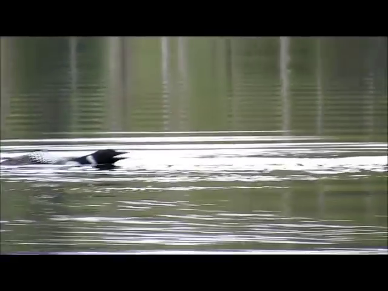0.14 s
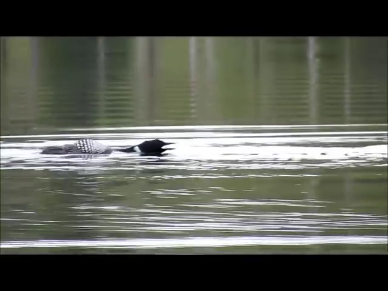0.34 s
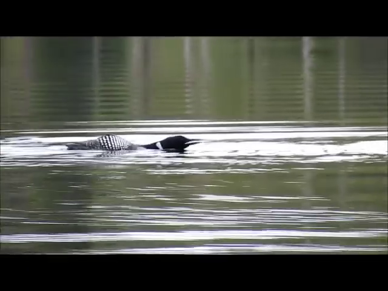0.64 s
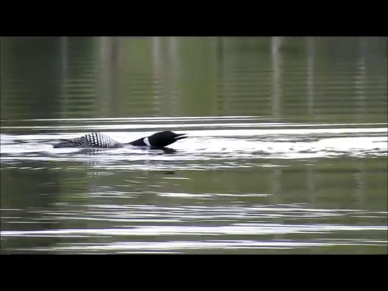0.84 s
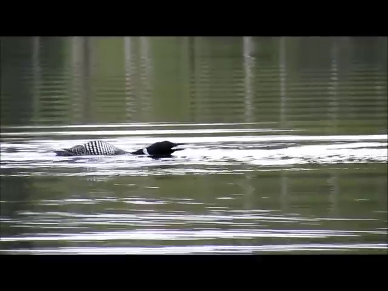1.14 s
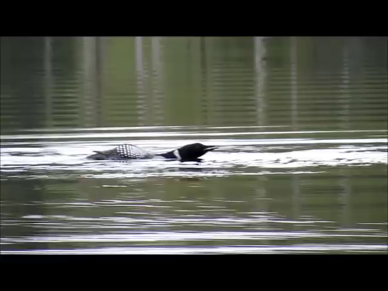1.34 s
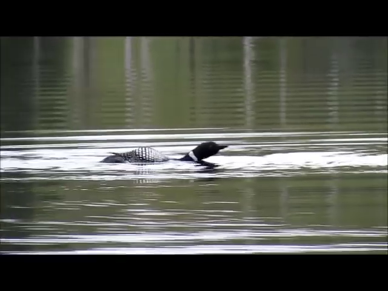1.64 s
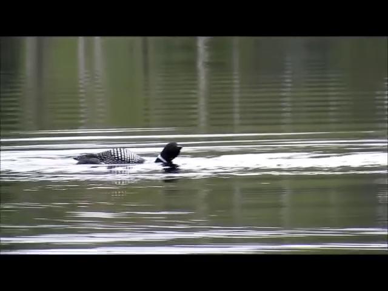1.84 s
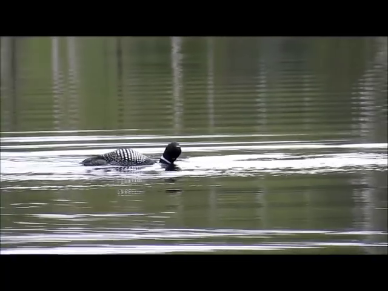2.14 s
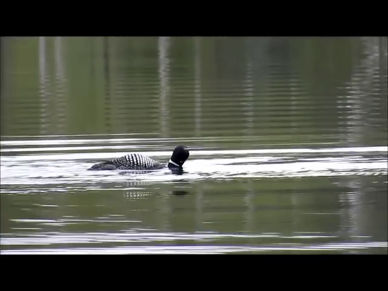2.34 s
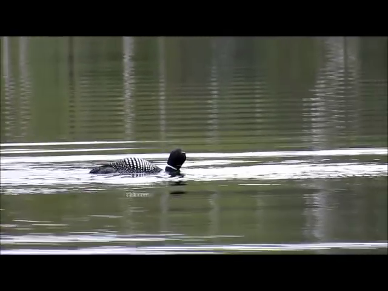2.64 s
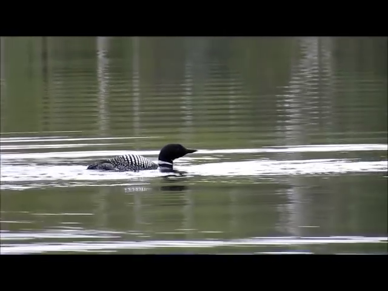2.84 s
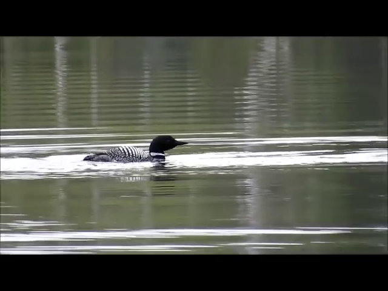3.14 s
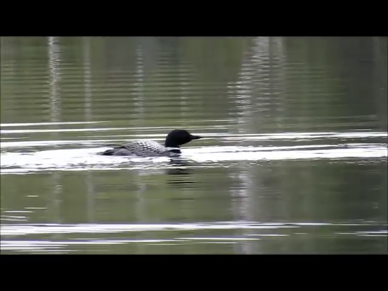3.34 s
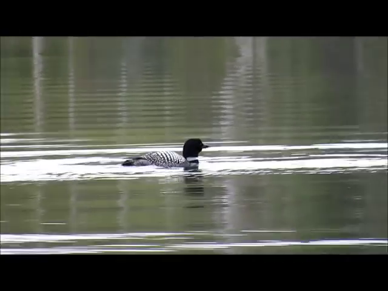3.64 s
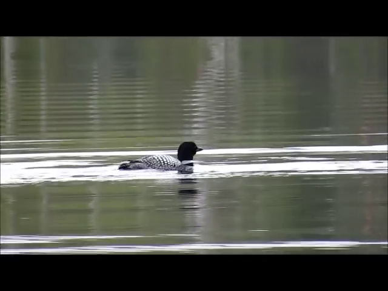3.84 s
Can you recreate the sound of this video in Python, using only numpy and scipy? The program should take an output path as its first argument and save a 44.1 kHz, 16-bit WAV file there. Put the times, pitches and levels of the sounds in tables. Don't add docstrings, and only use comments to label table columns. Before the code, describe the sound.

A loon's yodel is already sounding at 0 s: a loud, nearly pure whistle that steps up, splits into a rough, beating double tone near 0.4, and breaks downward. It leaps up again at 0.7, peaks, and sinks by 1.2. A second yodel rises at 1.2 and drops off by 1.65. Then faint wavering shore echoes, strongest near 3.2, sparse distant bird whistles, a trill around 2, steady hiss, low rumble, hum and tiny camera ticks.

```python
import sys
import numpy as np
from scipy import signal
from scipy.fft import rfft, irfft, next_fast_len
from scipy.io import wavfile
from scipy.ndimage import map_coordinates

SR = 44100
rng = np.random.default_rng(int(sys.argv[2]) if len(sys.argv) > 2 else 0)


def generate_wav(sig):
    pcm = np.round(np.clip(np.atleast_2d(sig).T, -1, 1) * 32767).astype(np.int16)
    wavfile.write(sys.argv[1], SR, pcm)


def linear_from_db(decibels):
    return 10 ** (np.asarray(decibels, float) / 20)


N = 176400
T = np.arange(N) / SR
EDGE_S = .003
RASP_HZ = 900
PORTS = np.array([[.5], [-.5]])


def unit(x):
    return x / np.sqrt(np.mean(x ** 2) + 1e-20)


def along(points, hz):
    f, v = np.transpose(points)
    return np.interp(np.log(hz + 1), np.log(f + 1), v)


def wobble(rate):
    knots = rng.standard_normal(int(N * rate / SR) + 4)
    return map_coordinates(knots, [T * rate])


def flutter(rate):
    return wobble(rate) + 1j * wobble(rate)


def filtered(x, response):
    m = next_fast_len(N + 8192)
    return irfft(rfft(x, m) * response(np.fft.rfftfreq(m, 1 / SR)), m)[..., :N]


def scatter(x, t60):
    t = T[:SR // 3]
    tail = rng.standard_normal((2, len(t))) * linear_from_db(-60 * t / t60)
    return signal.fftconvolve(np.atleast_2d(x), tail / np.linalg.norm(tail[0]), axes=1)[:, :N]


def note(rows, edge):
    s, *cols = np.transpose(rows)
    t = T[(T > s[0] - edge) & (T < s[-1] + edge)]
    since_start = t - s[0] + edge if s[0] > .01 else 1
    to_edge = np.minimum(since_start, s[-1] + edge - t)
    gate = np.sin(np.pi / 4 * np.clip(to_edge / edge, 0, 2)) ** 2
    start = round(t[0] * SR)
    return slice(start, start + len(t)), np.sqrt(2) * gate, [np.interp(t, s, c) for c in cols]


def spin(hz):
    return np.exp(2j * np.pi * (np.cumsum(hz) / SR + rng.random()))


def breath():
    skirt = 1 + linear_from_db(-33) * flutter(600)
    return skirt * linear_from_db(.12 * wobble(55))


def held_notes(skirt):
    # t/s, pitch f/Hz, level/dB, 2nd overtone level/dB, 3rd overtone level/dB
    held = [
        [(0, 1802, -41, -75, -77), (.05, 1886, -39, -78, -80.5), (.075, 1864, -36, -70, -70.5),
         (.15, 1824, -38, -75.5, -95.5), (.205, 1847, -39.5, -75.5, -76), (.258, 1893, -41, -82, -84),
         (.279, 1954, -43, -88, -73)],
        [(.713, 1760, -45, -85.5, -82), (.728, 1847, -38, -80.5, -91.5), (.742, 1890, -37.5, -72, -73),
         (.765, 1928, -38.5, -68, -70.5), (.806, 2010, -44.5, -75, -89)],
        [(.9, 1952, -38.5, -68, -76), (.915, 1922, -36.5, -63.5, -82.5), (.98, 1887, -36, -70.5, -92.5),
         (1.012, 1832, -37, -77.5, -80.5), (1.035, 1765, -41, -82, -78)],
        [(1.251, 1817, -42, -83, -94.5), (1.268, 1831, -39, -69, -66), (1.305, 1873, -36.5, -68.5, -65.5),
         (1.365, 1885, -35, -71, -77), (1.43, 1868, -36, -75.5, -78.5), (1.49, 1907, -38, -71, -76.5),
         (1.534, 1977, -42.5, -82, -76)],
    ]
    step_up = [
        (0.283, 2064, -47, -72.5, -75),
        (0.325, 2131, -48, -69, -82),
        (0.366, 2214, -49, -71.5, -98),
    ]
    step_down = [
        (1.037, 1570, -39, -76, -90),
        (1.06, 1475, -40, -100, -70.5),
        (1.098, 1394, -54, -98.5, -86),
    ]
    low_note = [
        (1.102, 1035, -50.5, -68, -88),
        (1.13, 988, -54.5, -74, -86),
        (1.18, 930, -62, -76, -90),
    ]
    out = np.zeros(N)
    for rows in [*held, step_up, step_down, low_note]:
        at, gate, (hz, db, second_db, third_db) = note(rows, EDGE_S)
        u = spin(hz)
        voice = linear_from_db(db) * (u + linear_from_db(-56) * u ** 4)
        voice = voice + linear_from_db(second_db) * u ** 2
        voice = voice + linear_from_db(third_db + 1.5 * wobble(25)[at]) * u ** 3
        out[at] += (gate * skirt[at] * voice).real
    return out


def water(x):
    # f/Hz, level/dB
    voice_pan = [(1900, 0.1), (2400, -1.3)]
    # t/s, left over right level/dB
    head_turn = [
        (.3, 0),
        (.8, 0.6),
        (1.6, 1),
    ]
    lead_s = 2.5e-5

    def path(hz):
        return linear_from_db(PORTS * along(voice_pan, hz)) * np.exp(2j * np.pi * hz * PORTS * lead_s)

    direct = filtered(x, path) * linear_from_db(PORTS * np.interp(T, *np.transpose(head_turn)))
    return direct + linear_from_db(-38) * scatter(x, .12)


def floor():
    # f/Hz, density level/dB per Hz
    mid_noise = [(24, -107), (75, -93), (300, -102), (470, -104), (760, -100), (1500, -110), (4000, -117),
                 (13500, -128)]
    # f/Hz, density level/dB per Hz
    side_noise = [(22, -90.5), (110, -80.5), (340, -88.5), (700, -97), (1600, -112), (3300, -116),
                  (8000, -123), (13500, -131)]
    # f/Hz, rms level/dB
    mains = [(60, -81.5), (120, -85), (180, -86.5), (240, -85), (300, -85), (480, -91.5)]
    layers = []
    for density in (mid_noise, side_noise):
        hiss = filtered(rng.standard_normal(N), lambda hz: linear_from_db(along(density, hz)))
        layers.append(linear_from_db(.4 * wobble(2.5)) * np.sqrt(SR / 2) * hiss)
    hum = sum(np.sqrt(2) * linear_from_db(db + 4.3 * wobble(7.1)) * spin(hz + 0 * T).real for hz, db in mains)
    mid, side = layers[0] + hum, layers[1]
    return np.array([mid + side, mid - side])


def birds():
    # start t/s, end t/s, first f/Hz, last f/Hz, level/dB
    whistles = [(0.101, .17, 2740, 2830, -76), (0.161, 0.308, 2930, 2880, -78.5),
                (0.167, .19, 2830, 2550, -75), (.27, 0.327, 3620, 2980, -80),
                (0.618, 0.705, 3420, 2820, -84), (0.767, .87, 2980, 3450, -82),
                (1.83, 1.892, 2520, 2564, -83), (3.496, 3.574, 2240, 2240, -82.5),
                (1.123, 1.212, 2847, 2686, -73), (1.242, 1.302, 2630, 2220, -79),
                (1.616, 1.69, 2570, 2580, -76.5), (1.754, 1.765, 3500, 3260, -77.5),
                (3.31, 3.366, 3210, 2980, -84), (3.4, 3.468, 2784, 2746, -74.5),
                (3.474, 3.535, 2766, 2380, -81), (3.574, 3.63, 3660, 3140, -78.5),
                (3.755, 3.809, 2740, 2070, -81)]
    # start t/s, end t/s, middle f/Hz, notes a second, level/dB
    start, end, middle, rate, trill_db = (1.94, 2.33, 2770, 30, -79)
    trill = []
    for s in np.arange(start, end, 1 / rate):
        last = middle - 1800 * (s - 2.2) ** 2
        trill.append((s, s + 0.3 / rate, last + 50, last, trill_db))
    out = np.zeros((2, N))
    for a, b, first, last, db in whistles + trill:
        at, gate, (hz,) = note([(a, first), (b, last)], 0.005)
        u = spin(hz) * (1 + .55 * flutter(90)[at])
        out[:, at] += (linear_from_db(db) * gate * u * np.exp(1.2j * PORTS)).real
    return out + linear_from_db(-6) * scatter(out, .3)


def ticks():
    # t/s, peak level/dB
    strikes = [(0.1042, -69), (0.1326, -72.5), (0.192, -71), (0.2264, -68.5), (0.4811, -71), (0.5442, -73),
               (0.5788, -49), (0.598, -65), (0.634, -63), (0.6503, -67), (0.9046, -65.5), (1.4863, -59),
               (1.4993, -71.5), (1.5944, -78), (1.6731, -76), (1.8447, -64), (1.8594, -71), (1.9488, -63),
               (1.9613, -54), (2.4553, -75), (2.7142, -67), (2.7387, -72), (2.817, -73.5), (2.9193, -68),
               (3.1717, -74), (3.265, -73), (3.465, -69), (3.6664, -64), (3.684, -65)]
    # t/s, level/dB, f/Hz, width f/Hz
    knock_s, knock_db, knock_hz, knock_width_hz = (1.9605, -55, 4500, 7000)
    tick_hz, tick_width_hz, t60, trim_db, pan_db = 11800, 2200, 0.0054, -0.5, -2
    bright, dull, t = np.zeros((2, N + 999)), np.zeros(N), T[:400]
    for s, db in strikes:
        decay = linear_from_db(db + trim_db - 60 * t / t60 + pan_db * PORTS)
        burst = decay * (rng.standard_normal(len(t)) + 0.83 * rng.standard_normal((2, len(t))))
        edge = np.diff(burst, 2)
        bright[:, round(s * SR):][:, :len(t)] += burst * linear_from_db(db + trim_db + 21) / np.linalg.norm(edge)
    dull[round(knock_s * SR):][:len(t)] = linear_from_db(knock_db - 60 * t / t60) * rng.standard_normal(len(t))

    def ring(f, centre, width):
        return (1j * f * width / (centre * centre - f * f + 1j * f * width)) ** 2

    def body(f):
        return ring(f, tick_hz, tick_width_hz) + .08 * ring(f, .7 * tick_hz, tick_hz)

    knock = filtered(dull, lambda f: ring(f, knock_hz, knock_width_hz))
    return 3 * filtered(bright[:, :N], body) + knock


def split_voice(skirt):
    # t/s, lower f/Hz, upper f/Hz, lower level/dB, upper level/dB, pitch jitter f/Hz
    splits = [
        [(.338, 2165, 2385, -75, -68, 10), (.356, 2195, 2380, -75, -61, 15), (.367, 2240, 2440, -57, -50, 20),
         (.374, 2200, 2430, -66, -50, 5), (.392, 2150, 2380, -63, -50, 10), (.404, 2000, 2300, -53, -52, 40)],
        [(.807, 2120, 2370, -49, -59, 12), (.83, 2148, 2375, -49, -49, 3), (.88, 2142, 2355, -50, -49, 5),
         (.892, 2110, 2365, -49, -49, 20), (.902, 2020, 2370, -50, -53, 30)],
        [(1.536, 2070, 2350, -48, -60, 15), (1.552, 2135, 2345, -51, -50, 20),
         (1.568, 2230, 2345, -53.5, -48.5, 8), (1.59, 2240, 2345, -53.5, -48.5, 8),
         (1.606, 2090, 2290, -53, -51, 30)],
    ]
    split_overtones = [(-16, -20, -15.5, -41, -30, -19, -36), (-15.5, -25, -16.5, -38.5, -31, -27.5, -23.5),
                       (-16, -15, -12, -31, -18, -10.5, -27)]
    below = (-14, -21)
    out = np.zeros(N)
    for rows, over_db in zip(splits, split_overtones):
        at, gate, (low, high, low_db, high_db, jitter) = note(rows, EDGE_S)
        u = spin(low + jitter * wobble(150)[at])
        v = spin(high + jitter * wobble(150)[at])
        p, q = linear_from_db(low_db), linear_from_db(high_db)
        pair = p * u + q * v
        mixed_below = p * sum(linear_from_db(db) * u * (-u / v) ** (k + 1) for k, db in enumerate(below))
        mixed_above = linear_from_db(-31.5) * np.sqrt(p * q) * v * v / u
        lower, upper = p / (p + q) * u, q / (p + q) * v
        seconds = [lower ** 2, -lower * upper, upper ** 2]
        thirds = [lower ** 3, lower ** 2 * upper, lower * upper ** 2, upper ** 3]
        over = (p + q) * (linear_from_db(over_db) @ np.array(seconds + thirds))
        rough = 0.0098 * jitter * flutter(RASP_HZ)[at]
        voice = pair * (1 + rough / 2) + mixed_below + over * (1 + 2 * rough) + mixed_above
        out[at] += (gate * skirt[at] * voice).real
    return out


def register_flips():
    # start t/s, end t/s, first f/Hz, last f/Hz, level/dB
    flips = [(.403, 0.427, 1888, 1732, -35.5), (0.423, 0.438, 1242, 1070, -46.5),
             (0.679, 0.692, 700, 790, -54.5), (0.685, 0.716, 1014, 1185, -48.5),
             (0.684, 0.701, 1410, 1800, -60), (1.177, 1.216, 623, 630, -64),
             (1.207, 1.224, 647, 760, -55.5), (1.218, 1.245, 1032, 1159, -47.5),
             (1.238, 1.255, 1555, 1654, -42.5), (1.606, 1.636, 1884, 1733, -34),
             (1.629, 1.649, 1256, 1064, -46.5)]
    # f/Hz, rms level/dB
    flip_overtones = [(1200, -43), (2200, -56.5), (3000, -86), (3600, -69), (4500, -68.5), (5600, -70),
                      (7000, -89.5)]
    out = np.zeros(N)
    rasp = 1 + linear_from_db(-23) * flutter(RASP_HZ)
    for a, b, first, last, db in flips:
        at, gate, (hz,) = note([(a + EDGE_S, first), (b - 2 * EDGE_S, last)], 2 * EDGE_S)
        u = spin(hz)
        done = (hz - first) / (last - first)
        over_db, fade_db = np.minimum(db + 47.0, 0), 0
        if last < first:
            over_db = over_db - 3 + np.minimum(db + 41, 0)
            fade_db = -7.5 * done
        else:
            over_db = over_db - 8 * (1 - done)
        over = sum(linear_from_db(along(flip_overtones, k * hz)) * u ** k for k in range(2, 7))
        voice = linear_from_db(db) * u * rasp[at] + over * linear_from_db(over_db)
        out[at] += (gate * voice * linear_from_db(fade_db)).real
    return out


def far_shore():
    # t/s, centre f/Hz, level/dB
    echo = [(.45, 1890, -71.5), (0.681, 1900, -78.5), (1.7, 1880, -80), (1.76, 1890, -74),
            (2.08, 1870, -77.5), (2.5, 1870, -78), (2.669, 1890, -83.5), (2.74, 1915, -75.5),
            (3.051, 1880, -74), (3.11, 1875, -87), (3.159, 1875, -68.5), (3.3, 1876, -74.5),
            (3.45, 1878, -75.5), (3.68, 1875, -78.5), (3.76, 1875, -77), (4, 1870, -81)]
    width_hz, opposed = 44, .35
    slow = filtered(rng.standard_normal((4, N)), lambda hz: np.exp(-(hz / width_hz) ** 2 / 2))
    s, hz, db = np.transpose(echo)
    a, b = ((slow[:2] + 1j * slow[2:]) * spin(np.interp(T, s, hz))).real
    mid, side = unit(a), opposed * unit(b)
    return linear_from_db(np.interp(T, s, db) + 1.4 * wobble(14)) * np.array([mid + side, mid - side])


def scene():
    skirt = breath()
    loon = held_notes(skirt) + split_voice(skirt) + register_flips()
    return water(loon) + floor() + birds() + ticks() + far_shore()


def low_pass(x):
    return signal.sosfilt(signal.butter(12, 15000, fs=SR, output="sos"), x)


def record(dry):
    # f/Hz, width f/Hz, level/dB
    notches = [(3930, 130, -11), (7880, 110, -13)]

    def camera_filter(f):
        dips = sum(db * np.exp(-((f - centre) / width) ** 2) for centre, width, db in notches)
        roll_off = -8.5 * np.clip(f - 13300, 0, None) / 1000
        return linear_from_db(dips + roll_off)

    return low_pass(filtered(dry, camera_filter))


dry = scene()
out = record(dry)
generate_wav(out)
```